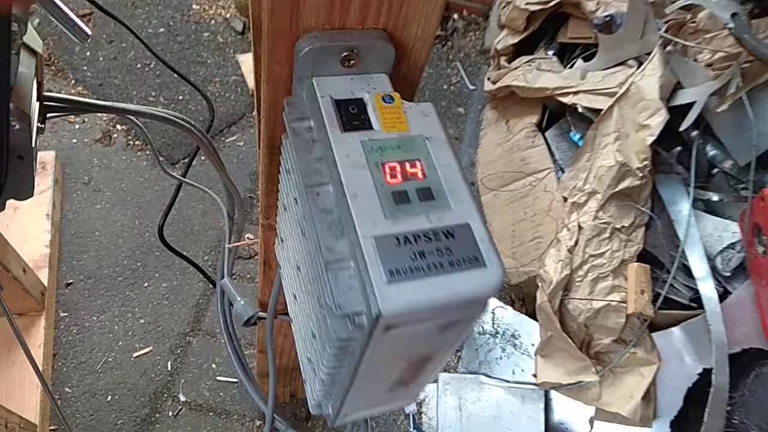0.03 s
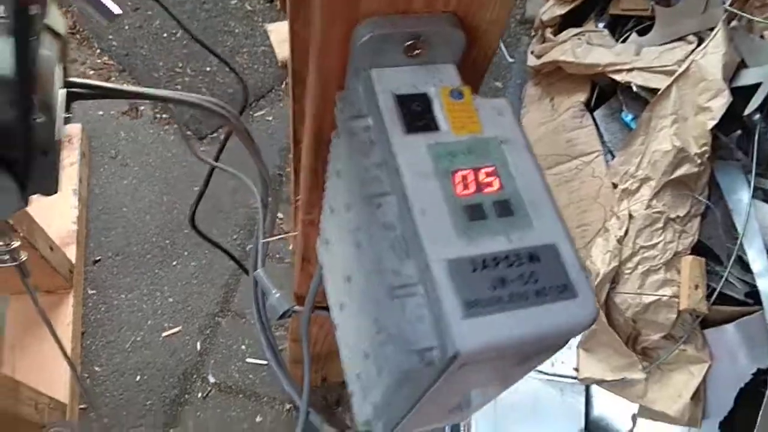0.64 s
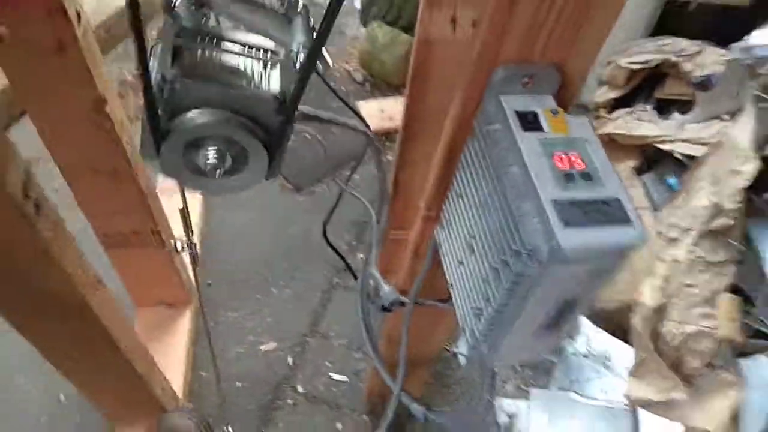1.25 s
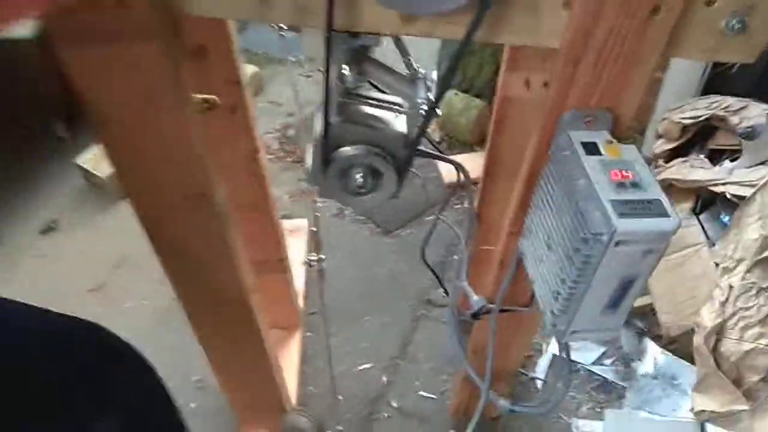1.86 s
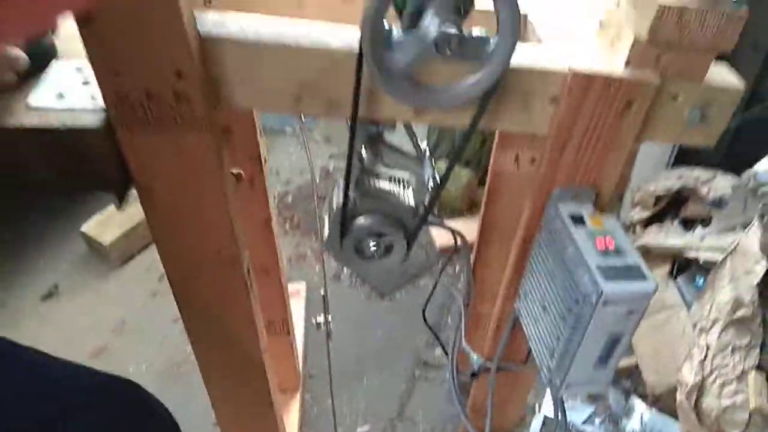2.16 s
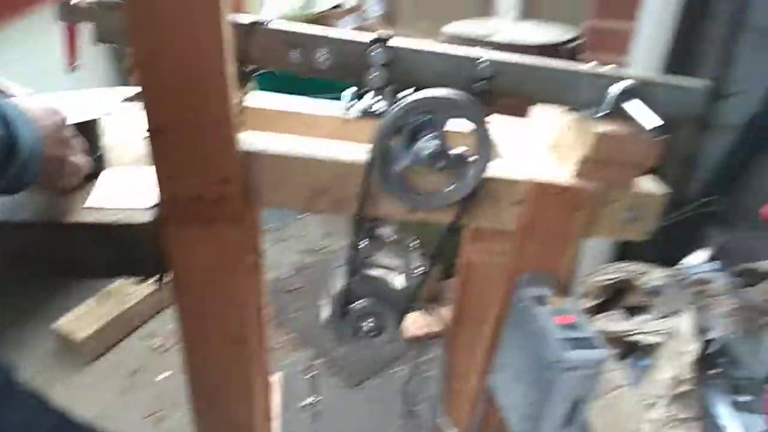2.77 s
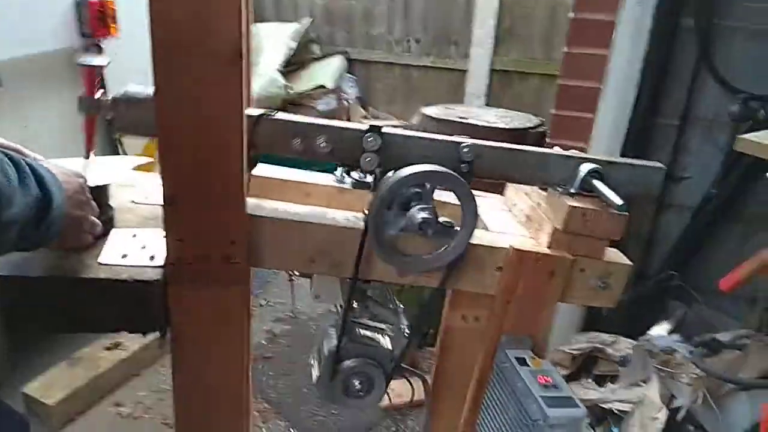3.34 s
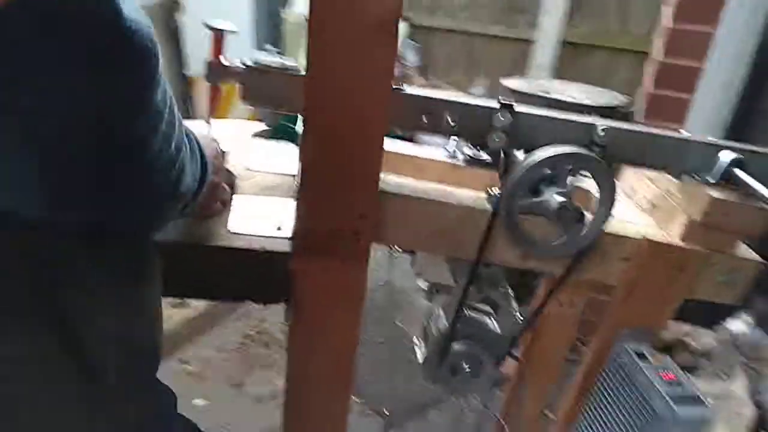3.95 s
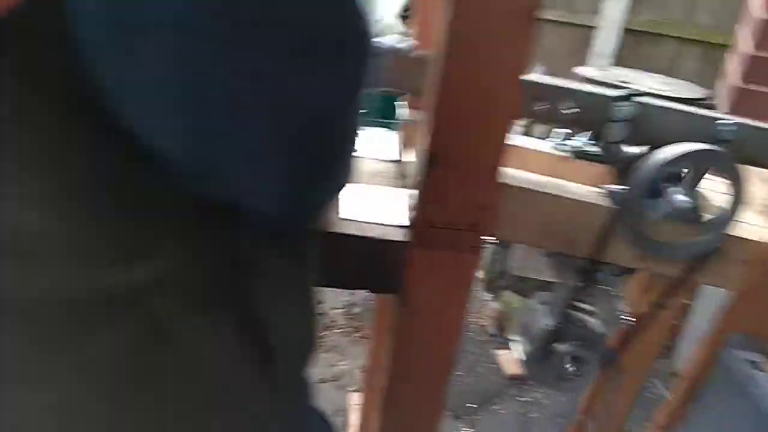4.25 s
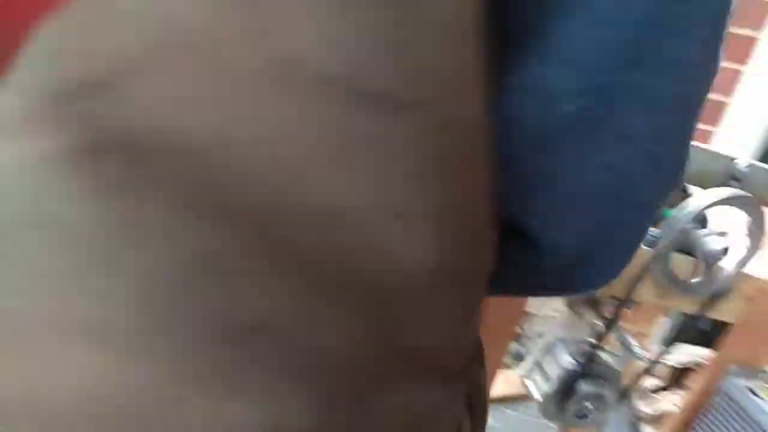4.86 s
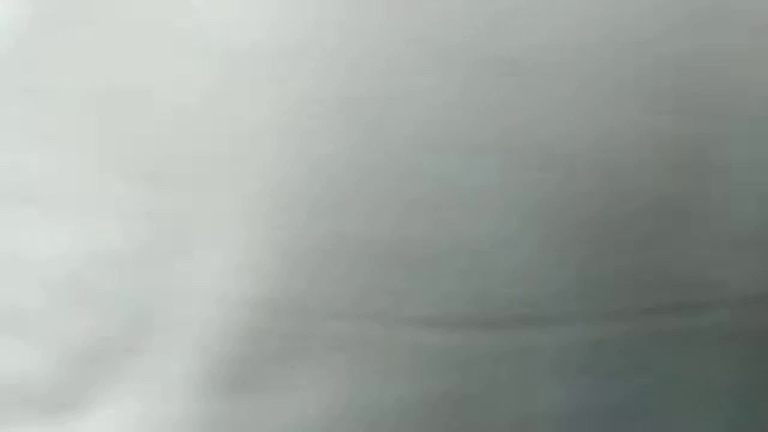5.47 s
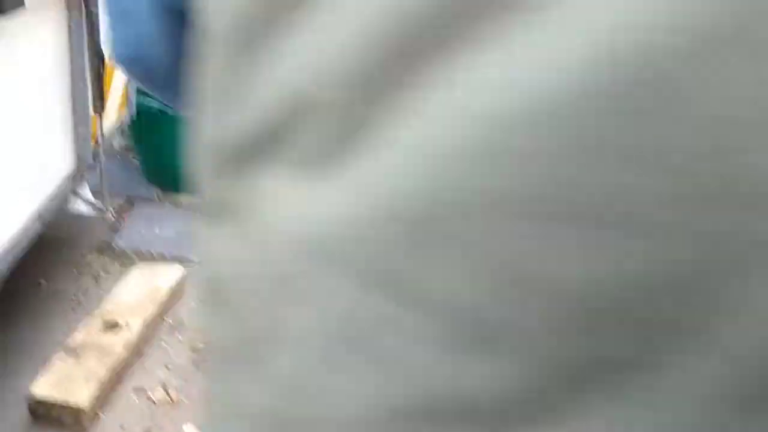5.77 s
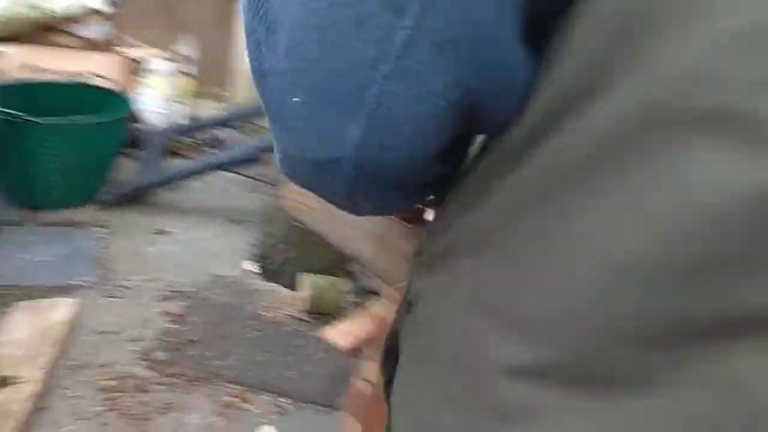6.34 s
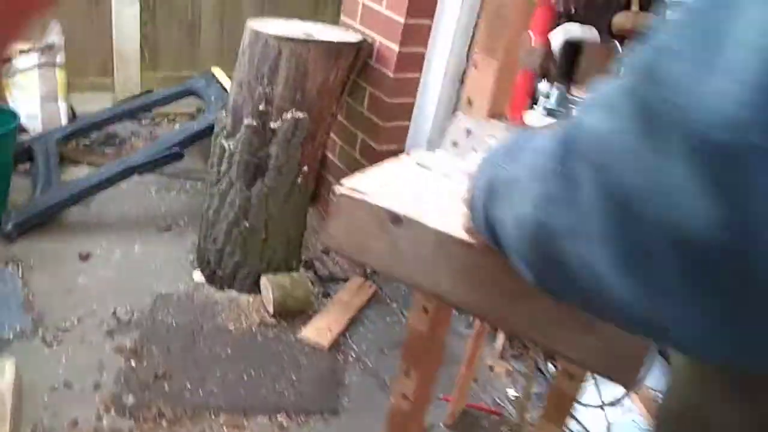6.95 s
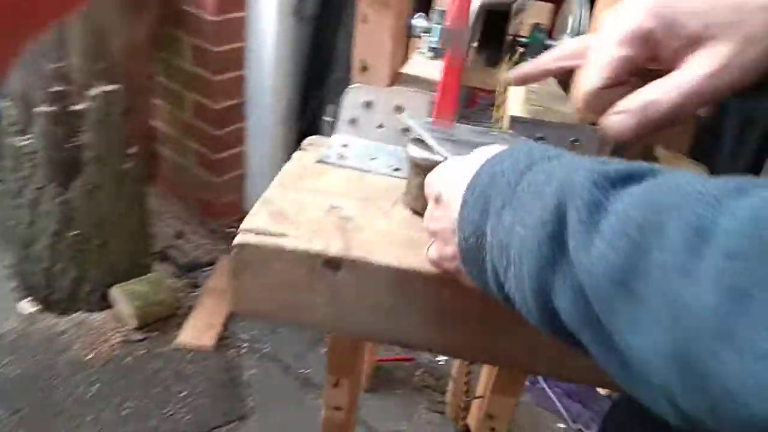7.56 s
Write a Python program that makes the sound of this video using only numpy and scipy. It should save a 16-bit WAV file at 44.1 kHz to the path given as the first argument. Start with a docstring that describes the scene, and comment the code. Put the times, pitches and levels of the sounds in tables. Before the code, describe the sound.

In a yard, a belt-driven steel hammer on a timber frame pounds evenly, close to the microphone. Each stroke clacks, crashes and rebounds with a light chatter, while the motor hums quietly and loose parts tick. After about five seconds the strokes quicken and crowd into a busier clatter. Two dull knocks on the microphone come just before the speed-up and near the end.

```python
"""A homemade power hammer in a yard: a belt-driven cam lifts a steel lever on a timber frame and drops it.
From the start the motor hums, the belt rushes and the controller whines. Each turn gives a clack of the
cam, the blow on the anvil, a rebound and a last rattle; loose parts tick in between. At 4.5 s the
moving microphone is bumped. After 5 s the motor speeds up and the four sounds of a turn crowd together.
Near 7 s comes a second bump."""
import sys
import numpy as np
from scipy import signal
from scipy.fft import rfft, irfft, next_fast_len
from scipy.io import wavfile
from scipy.ndimage import map_coordinates

SR = 44100
rng = np.random.default_rng(int(sys.argv[2]) if len(sys.argv) > 2 else 0)


def pcm_store(signal):
    """Save signal as 16-bit PCM."""
    levels = np.round(np.clip(np.atleast_2d(signal), -1, 1) * 32767)
    wavfile.write(sys.argv[1], SR, levels.astype(np.int16).T)


N = 340011
T = np.arange(SR * 2 // 5) / SR  # time axis of one hit, s
BODY_PAN_DB = 3  # lever and frame, left over right

# head meets anvil: t/s, crash level/dB, thud level/dB
BLOWS = [(0.3105, -5.5, -17), (0.577, -6, -17.5), (0.84, -5.5, -17.5), (1.1035, -6, -17),
         (1.3673, -5, -17.5), (1.6295, -4.5, -20), (1.895, -4, -18.5), (2.147, -4, -17),
         (2.4051, -4, -23.5), (2.6666, -4, -21.5), (2.9264, -3.5, -20), (3.194, -4, -23.5),
         (3.463, -3.5, -27), (3.7214, -3.5, -24), (3.9851, -2.5, -21), (4.2592, -2.5, -16.5),
         (4.5373, -1.5, -27), (4.802, -1.5, -28.5), (5.064, -4.5, -19), (5.3158, -5.5, -21),
         (5.5137, -3, -29), (5.7211, -3.5, -24.5), (5.9037, -3, -26), (6.0913, -3.5, -21.5),
         (6.2853, -2.5, -20), (6.4859, -2.5, -19), (6.6811, -2.5, -21), (6.8734, -2, -20),
         (7.0605, -2.5, -19), (7.2518, -3.5, -16.5), (7.4406, -4.5, -18.5), (7.631, -4.5, -17.5)]
# timber frame and steel bar: f/Hz, level/dB, t60/s
FRAME_MODES = [(133, -16, 0.39), (192.2, -4, 0.4), (238.6, -1.5, 0.23), (289.5, -3.5, 0.24), (369, 0, 0.23),
               (427, -1, 0.24), (500.6, 3.5, 0.26), (791, -9, 0.17)]
BAR_MODES = [(2250, -2, .15), (2963, 0, .19), (3315, 0, .15), (3735, -1, .12), (5290, -4, .14),
             (7546, -1, .15), (11353, -6, .15)]
# spectra of the struck parts: f/Hz, level/dB
STEEL_SPECTRUM = [(1200, -79), (2100, -9.5), (2600, -5.5), (3300, -0.5), (4700, -4), (6800, 0.5),
                  (8700, 3.5), (10500, -1.5), (12500, -9), (15500, -20)]
CAM_SPECTRUM = [(1200, -39), (2100, -5), (2700, -4), (3800, -0.5), (4900, -3), (6200, -2), (7500, 0),
                (9000, 2.5), (11000, -6), (15500, -26)]
LEVER_SPECTRUM = [(250, -15.5), (520, 0), (680, -2.5), (850, -3.5), (1100, 0), (1450, -0.5), (1750, -4.5),
                  (2100, -10.5), (3000, -22.5)]


def blows():
    """The head lands: steel crashes, the lever clanks, a thud sets the frame ringing."""
    # first contact and timber: f/Hz, level/dB
    crack_spectrum = [(500, -11), (3000, -35), (9500, 14), (15000, -10)]
    timber_spectrum = [(25, -37), (70, -26), (120, -8), (190, -2), (290, 8.5), (400, 5), (520, -22),
                       (700, -32), (1100, -46)]
    # pairs are (easy, fast); at speed the head lands less squarely and clatters longer
    rise_s, t60_s = (0.00084, 0.00071), (0.11, 0.13)
    ring_hz, ring_db = (1350, 1617), (-19, -19.7)
    thud_hz, frame_db = (430, 395), (-33.5, -29)
    out, body = np.zeros((2, N)), noise(LEVER_SPECTRUM, 0.27)
    for s, db, thud_db in BLOWS:
        pan_db, _, lever_db, *colour = perspective(s)
        fast = speed(s)
        crash = struck(steel(STEEL_SPECTRUM, *colour) * envelope(paced(rise_s, s), paced(t60_s, s)))
        crack = (1 - fast) * struck(noise(crack_spectrum, 0.066) * envelope(0.00076, 0.032))
        bar = modes(BAR_MODES, scatter_db=2.5, spread_rad=1.2)
        add(out, s, amp(db) * (amp(-10) * crash + amp(-16) * crack + amp(-27.5) * bar), pan_db)
        # the head hops once on the work
        hop = struck(steel(STEEL_SPECTRUM, *colour) * envelope(0.0013, 0.11))
        add(out, s + rng.uniform(0.0091, 0.022), amp(db - 15) * hop, pan_db)
        hz = paced(ring_hz, s) * np.exp(0.05 * rng.standard_normal())
        ring = lever(body, hz, focus_db=6.5, width_hz=27, alike=0.31, rise_s=0.0051, t60_s=0.16)
        # fast blows wake the lever's next resonance
        clank = lever(body, hz=2480, focus_db=8, width_hz=250, alike=0.3, rise_s=0.005, t60_s=0.13)
        add(out, s, amp(lever_db + paced(ring_db, s)) * (ring + fast * amp(-11) * clank), BODY_PAN_DB)
        # the anvil beam gives way for a few cycles
        pulse = np.exp(-((T - 0.0075) / 0.0046) ** 2) * np.minimum(T / 0.003, 1)
        thud = struck(pulse * np.sin(2 * np.pi * paced(thud_hz, s) * T))
        timber = amp(-11) * struck(noise(timber_spectrum, 0.7) * envelope(0.003, 0.16))
        frame = modes(FRAME_MODES, scatter_db=2.5, spread_rad=0.086, detune=0.025)
        add(out, s, amp(thud_db - 4.5) * (thud + timber) + amp(paced(frame_db, s)) * frame, BODY_PAN_DB)
    return out


def cam_lifts():
    """Before each blow the cam grazes the lever, then takes its weight with a bright clack."""
    lead_s, ring_hz, ring_db = (0.033, 0.019), (1347, 1392), (-9.3, -6.3)  # (easy, fast)
    out, body = np.zeros((2, N)), noise(LEVER_SPECTRUM, 0.35)
    for s, db, _ in BLOWS:
        pan_db, cam_db, _, *colour = perspective(s)
        at_s, clack_db = s - paced(lead_s, s), db + cam_db
        graze = struck(steel(CAM_SPECTRUM, *colour) * envelope(0.0038, 0.16))
        clack = struck(steel(CAM_SPECTRUM, *colour) * envelope(0.0028, 0.082))
        hz = paced(ring_hz, s)
        ring = lever(body, hz, focus_db=10, width_hz=58, alike=0.97, rise_s=0.007, t60_s=0.13)
        add(out, at_s - 0.007, amp(clack_db - 7.5) * graze, pan_db)
        add(out, at_s, amp(clack_db) * clack, pan_db)
        add(out, at_s, amp(clack_db + paced(ring_db, s)) * ring, BODY_PAN_DB)
    return out


def rebounds():
    """After each blow the lever drops back with a duller, chattering knock."""
    lag_s, ring_hz, ring_db = (0.068, 0.052), (1136, 1267), (-24, -23.5)  # (easy, fast)
    throw_s_per_db = 0.0013  # a harder blow throws the lever higher, so it lands later
    mean_db = np.transpose(BLOWS)[1].mean()
    out, body = np.zeros((2, N)), noise(LEVER_SPECTRUM, 0.14)
    for s, db, _ in BLOWS:
        pan_db, _, lever_db, *colour = perspective(s)
        at_s = s + paced(lag_s, s) + throw_s_per_db * (db - mean_db)
        chatter = struck(steel(CAM_SPECTRUM, *colour) * envelope(0.0016, 0.16))
        bar = modes(BAR_MODES, scatter_db=2.5, spread_rad=1.2)
        add(out, at_s, amp(db + lever_db) * (amp(-26) * chatter + amp(-32.5) * bar), pan_db)
        hz = paced(ring_hz, s)
        ring = lever(body, hz, focus_db=7.5, width_hz=84, alike=0.38, rise_s=0.0036, t60_s=0.115)
        frame = modes(FRAME_MODES, scatter_db=3, spread_rad=0.18, detune=0.025)
        add(out, at_s, amp(lever_db + paced(ring_db, s)) * ring + amp(-34) * frame, BODY_PAN_DB)
    return out


def steel(spectrum, sheen_db=0, presence_db=0):
    """Crowded steel modes; each contact picks out different ones."""
    def gain(hz):
        peaks_db = 4.6 * ripple(hz, step_hz=110) + 1.8 * ripple(hz, step_hz=700)
        top = 1 / (1 + np.exp((10500 - hz) / 600))
        middle = np.exp(-((hz - 3750) / 550) ** 2)
        return amp(peaks_db + sheen_db * top + presence_db * middle)
    return unit(filtered(noise(spectrum, 0.038), gain))


def lever(body, hz, focus_db, width_hz, alike, rise_s, t60_s):
    """Crowded lever modes; the contact point favours those near hz, and a higher hz rings brighter."""
    def gain(f):
        peak_db = focus_db / (1 + ((f - hz) / width_hz) ** 2)
        tilt_db = 12 * np.log2(hz / 1300) * np.log2(np.clip(f, 500, 2500) / hz)
        return amp(peak_db + tilt_db + 3 * ripple(f, step_hz=70))
    ring = blend(body, noise(LEVER_SPECTRUM, 0.17), alike)
    return struck(filtered(ring, gain) * envelope(rise_s, t60_s))


def modes(table, scatter_db, spread_rad, detune=0):
    """Damped sines, new in strength at each hit and in phase on each side; loose joints detune them."""
    hz, db, t60_s = np.transpose(table)[:, :, None]
    hz = hz * (1 + rng.standard_normal(hz.shape) * detune)
    phase = rng.uniform(0, 2 * np.pi, hz.shape) + spread_rad * rng.standard_normal((2, *hz.shape))
    decay = amp(db + scatter_db * rng.standard_normal(hz.shape) - 60 * T / t60_s)
    ring = (decay * np.sin(2 * np.pi * hz * T + phase)).sum(1)
    return struck(ring * np.minimum(T / 0.0054, 1))


def rattles():
    """Slack in the linkage settles after each blow and now and then between; the sound opens on the knock and
    rattle that end an earlier turn."""
    # the rebound knock and rattle that end a turn just before the start, two stray rattles, and extra settling
    # as the linkage works loose: t/s, level/dB
    extra_rattles = [(0.107, -24.5), (0.193, -27.5), (2.074, -15.5), (2.093, -18.5)]
    looseness = [(2.4, -1), (3.8, 5), (4.95, 6), (5.3, -3)]
    lag_s = (0.15, 0.1)  # (easy, fast)
    settling = [(s + paced(lag_s, s), np.interp(s, *np.transpose(looseness)) - 29.5) for s, *_ in BLOWS]
    out = np.zeros((2, N))
    for s, db in settling + extra_rattles:
        rattle = noise(LEVER_SPECTRUM, 0.13) + amp(-5) * steel(CAM_SPECTRUM)
        add(out, s, amp(db - 13.5) * struck(rattle * envelope(0.0024, 0.14)), pan_db=-2)
    return out


def ticks():
    """Loose parts tick drily, each with a bright and a dull share."""
    # ticks: t/s, level/dB, dull over bright/dB
    events = [(0.984, -30.5, 19.5), (3.875, -14, -13), (4.095, -22, -13), (4.117, -17.5, 1),
              (4.93, -9, -13), (6.792, -7, 0), (6.977, 1, -3.5)]
    out = np.zeros((2, N))
    for s, db, dull_db in events:
        tick = noise(STEEL_SPECTRUM, 0.09) + amp(dull_db) * noise(LEVER_SPECTRUM, 0.56)
        add(out, s, amp(db - 10) * tick * envelope(0.00099, 0.0079))
    return out


def bumps():
    """Dull knocks on the microphone, mostly left."""
    knocks = [(4.489, -20.5), (4.503, -17), (4.51, -20.5), (6.976, -18)]  # t/s, level/dB
    knock_spectrum = [(75, -40), (150, -3), (200, -5), (330, -6), (700, -12.5), (1200, -22.5), (4000, -36),
                      (12000, -28.5)]  # f/Hz, level/dB
    out = np.zeros((2, N))
    for s, db in knocks:
        add(out, s, amp(db) * struck(noise(knock_spectrum, 0.46) * envelope(0.0009, 0.15)), pan_db=14)
    return out


def belt():
    """Belt and bearings rush louder with speed; the hiss swells briefly three times."""
    # running drive: f/Hz, level/dB
    rumble_spectrum = [(25, -78), (75, -97), (130, 3.5), (200, 14.5), (290, 7), (550, 11), (850, 10.5),
                       (1100, -3), (1400, -11), (2200, -14), (4000, -44), (8000, -14)]
    hiss_spectrum = [(1000, -20), (2500, 1), (4500, 5), (6000, 2), (9000, 3), (11500, -1.5), (14000, -17),
                     (16000, -24)]
    hiss_swells = [(1.384, -42, 0.24), (4.75, -45.5, 0.22), (7.042, -35.5, 0.19)]  # t/s, level/dB, half length/s
    rumble_db, hiss_db = (-48, -44), (-51.5, -45)  # (easy, fast)
    t = np.arange(N) / SR
    rumble = amp(paced(rumble_db, t)) * noise(rumble_spectrum, 0.92, N)
    surge = sum(amp(db) * np.exp(-((t - s) / half_s) ** 2) for s, db, half_s in hiss_swells)
    hiss = np.hypot(amp(paced(hiss_db, t)), surge) * noise(hiss_spectrum, 0.041, N)
    return rumble + hiss


def motor():
    """The motor hums in two narrow bands; its controller whines at a wavering switching tone."""
    hum_bands = [(520, -52, 35), (4240, -52.5, 260)]  # f/Hz, level/dB, width/Hz
    whine_levels = [(0.3, -54), (4.3, -51), (4.7, -37), (5.1, -48), (6.3, -54), (7.0, -42), (7.7, -52)]  # t/s, level/dB
    white = rng.standard_normal((2, N))
    hum = sum(amp(db) * unit(filtered(white, lambda f: 1 / (1 + (2 * (f - hz) / width_hz) ** 4)))
              for hz, db, width_hz in hum_bands)
    whine_hz = 14990 + 60 * unit(filtered(white, lambda f: f < 110))
    whine_db = np.interp(np.arange(N) / SR, *np.transpose(whine_levels))
    return hum + amp(whine_db) * np.sin(2 * np.pi * np.cumsum(whine_hz, axis=1) / SR)


def yard(x):
    """Fence and brick walls answer; the top treble dies first."""
    decay_times = [(150, 0.28), (600, 0.27), (3000, 0.82), (9000, 0.076), (15000, 0.1)]  # f/Hz, t60/s
    hz, t, bins = signal.stft(rng.standard_normal((2, SR // 2)), SR, nperseg=256)
    tail = signal.istft(bins * amp(-60 * t / along(decay_times, hz)[:, None]), SR, nperseg=256)[1]
    tail = np.pad(tail, ((0, 0), (SR // 80, 0)))  # 12.5 ms pre-delay
    return signal.fftconvolve(x, tail / np.linalg.norm(tail[0]), axes=1)[:, :N]


def perspective(s):
    """Balance and colour of the hammer at the moving microphone at time s."""
    mic_path = [(0.3, -3.5, -14, -0.5, 1.5, 4.5), (1.4, -4.5, -14.5, 0.5, 3.5, 5.5),
                (2.6, -9, -13.5, 0.5, -4, .5), (3.25, -7, -13.5, -3, -4, .5),
                (3.85, -7.5, -14, -0.5, 0.5, 0), (4.25, -7, -15.5, 0.5, -3.5, 2.5),
                (4.6, 0.5, -12, -0.5, 3.5, 0), (5.06, -2.5, -12.5, 3, -7, -3),
                (5.5, -1.5, -16.5, 0, 4.5, -1.5), (6.1, -2.5, -14, 1, -2, 0.5),
                (6.9, -1.5, -12, 3.5, 1, -1), (7.6, -6.5, -9, 0.5, 2, -7)]  # t/s, steel pan/dB, cam/dB, lever/dB, sheen/dB, presence/dB
    when, *columns = np.transpose(mic_path)
    return [np.interp(s, when, column) for column in columns]


def speed(s):
    """Motor speed at time s, from the spacing of the blows: 0 easy, 1 fast."""
    easy_hz, fast_hz = 3.85, 5.05
    when = np.transpose(BLOWS)[0]
    rate_hz = np.interp(s, (when[1:] + when[:-1]) / 2, 1 / np.diff(when))
    return np.clip((rate_hz - easy_hz) / (fast_hz - easy_hz), 0, 1)


def paced(pair, s):
    """Value of an (easy, fast) pair at time s."""
    easy, fast = pair
    return easy + (fast - easy) * speed(s)


def amp(db):
    """Decibels to gain."""
    return 10 ** (np.asarray(db) / 20)


def unit(x):
    """Scale to rms 1."""
    return x / np.sqrt(np.mean(x ** 2) + 1e-20)


def struck(x):
    """Scale a hit to rms 1 over its first 20 ms."""
    return x / np.sqrt(np.mean(x[..., :SR // 50] ** 2) + 1e-20)


def envelope(rise_s, t60_s):
    """Contact builds linearly, then the ring dies away."""
    return np.minimum(T / rise_s, 1) * amp(-60 * np.maximum(T - rise_s, 0) / t60_s)


def along(points, hz):
    """Interpolate (f/Hz, value) points on a log axis."""
    f, values = np.transpose(points)
    return np.interp(np.log(hz + 1), np.log(f), values)


def ripple(hz, step_hz):
    """Smooth random curve over frequency, one knot per step."""
    return map_coordinates(rng.standard_normal(2048), [hz / step_hz], mode="wrap")


def filtered(x, response):
    """Apply a frequency response."""
    n = x.shape[-1]
    padded = next_fast_len(n + 8192)
    return irfft(rfft(x, padded) * response(np.fft.rfftfreq(padded, 1 / SR)), padded)[..., :n]


def blend(common, fresh, alike):
    """Mix with the power share `alike` from the common signal."""
    return np.sqrt(alike) * common + np.sqrt(1 - alike) * fresh


def noise(spectrum, alike, size=len(T)):
    """Coloured stereo noise of rms 1; the share `alike` is common to both sides."""
    white = rng.standard_normal((3, size))
    return unit(filtered(blend(white[0], white[1:], alike), lambda hz: amp(along(spectrum, hz))))


def add(track, s, sound, pan_db=0):
    """Mix a hit in at time s; pan_db is left over right."""
    sides = unit(amp([[pan_db / 2], [-pan_db / 2]]))
    part = track[:, max(round(s * SR), 0):][:, :len(T)]
    part += (sides * sound)[:, :part.shape[1]]


def scene():
    """The hammer in its yard over the running drive."""
    hammer = cam_lifts() + blows() + rebounds()
    return hammer + amp(-21) * yard(hammer) + rattles() + ticks() + bumps() + belt() + motor()


def record(dry):
    """A moment of silence, then low cut, soft clipping and a band limit."""
    start_s, low_cut_hz, ceiling, top_hz = 0.104, 72, 0.92, 15900
    opened = dry * (np.arange(N) / SR > start_s)
    thinned = filtered(opened, lambda hz: (1j * hz / (low_cut_hz + 1j * hz)) ** 2)
    rounded = thinned / (1 + np.abs(thinned / ceiling) ** 8) ** (1 / 8)
    return filtered(rounded, lambda hz: hz < top_hz)


dry = scene()
out = record(dry)
pcm_store(out)
```